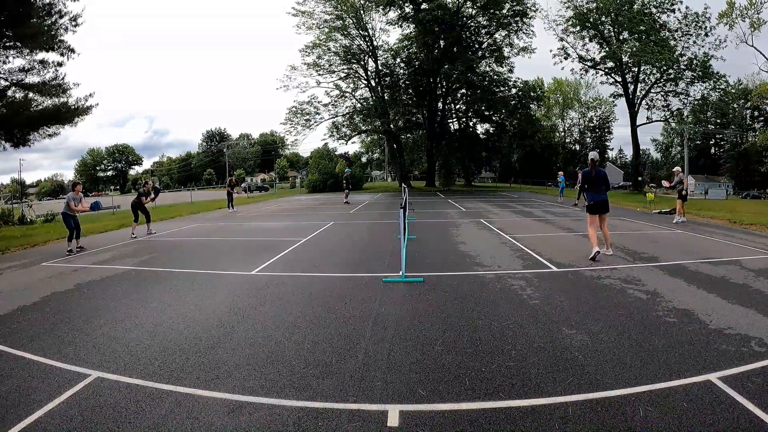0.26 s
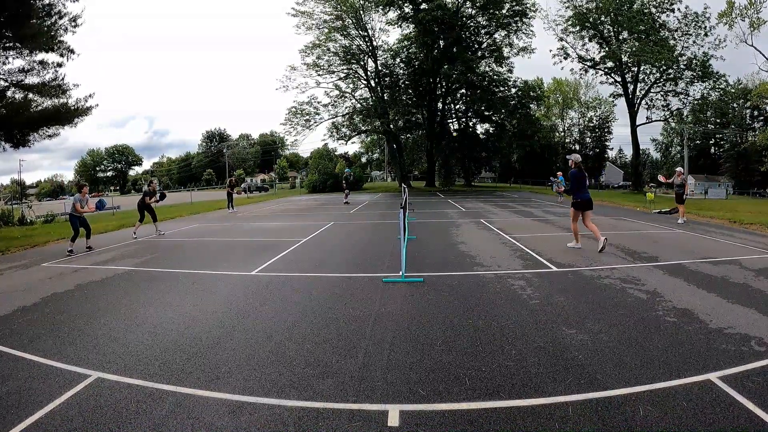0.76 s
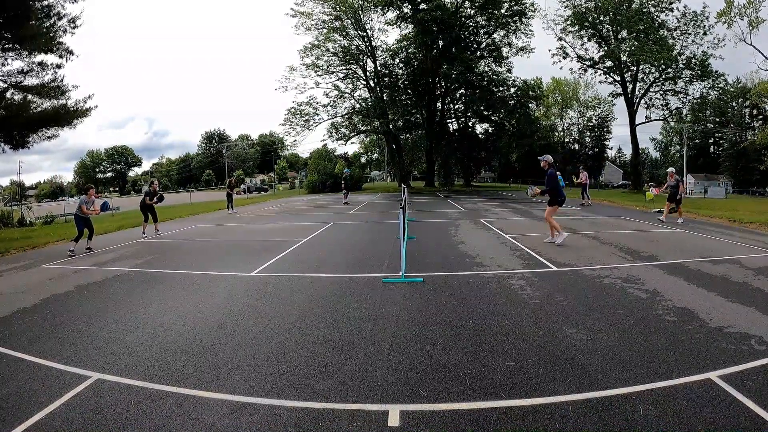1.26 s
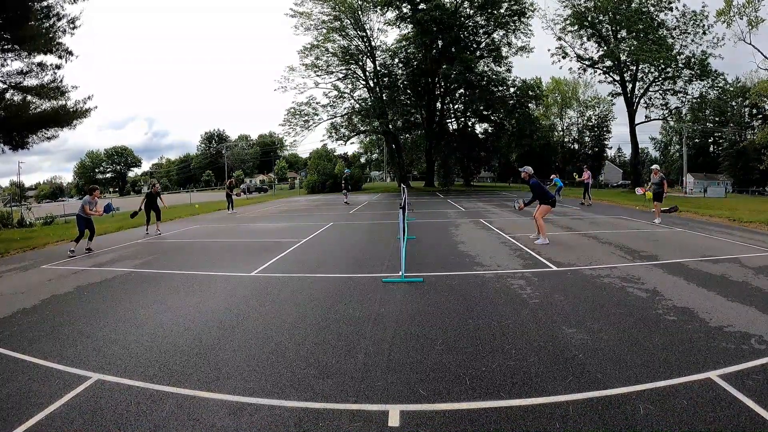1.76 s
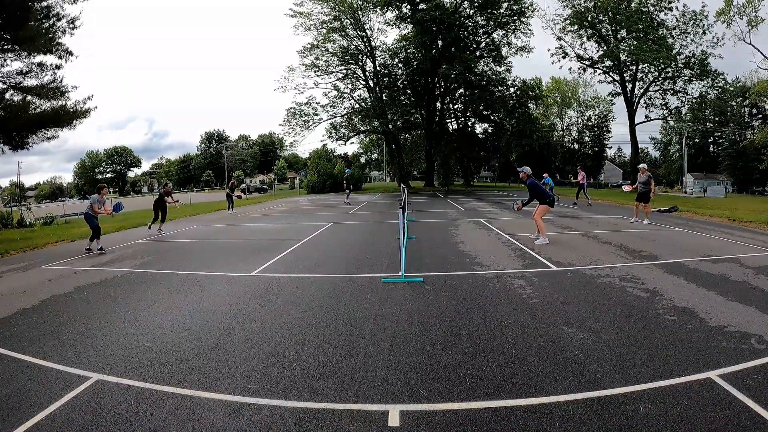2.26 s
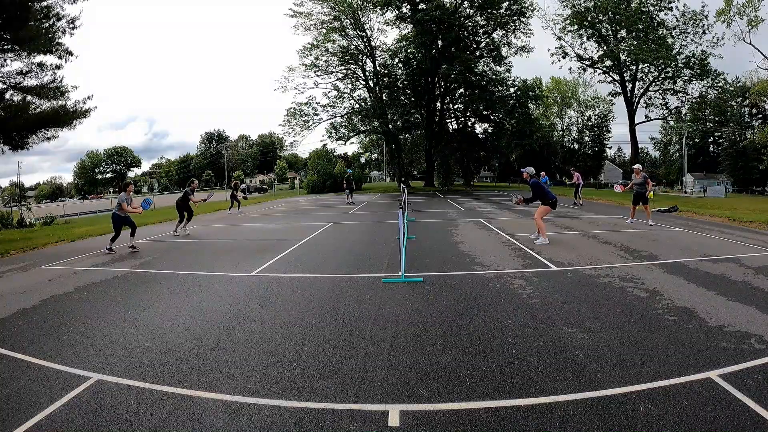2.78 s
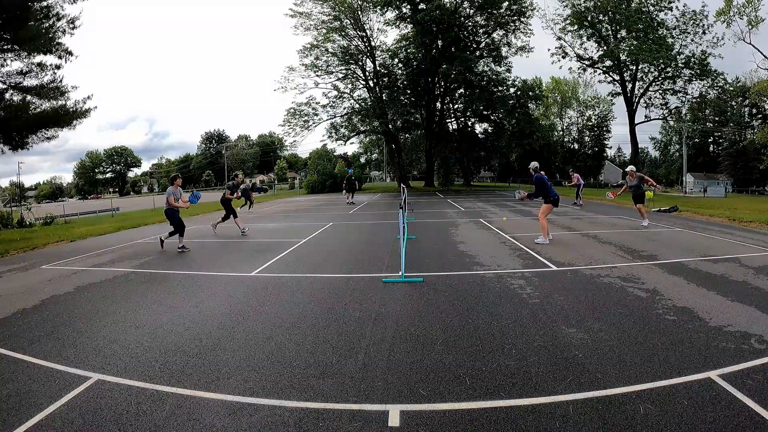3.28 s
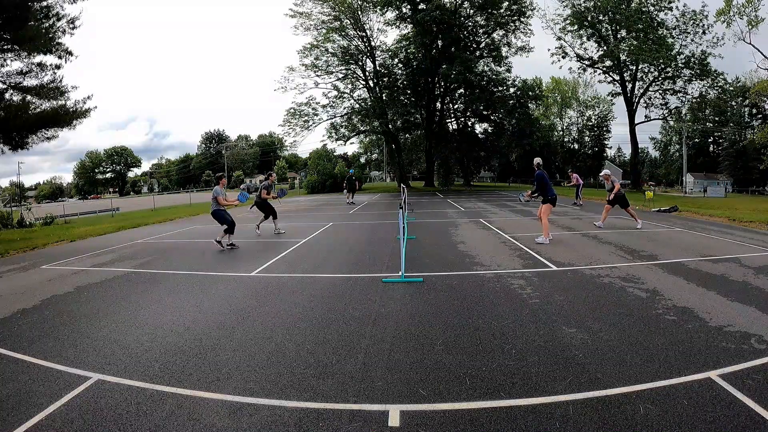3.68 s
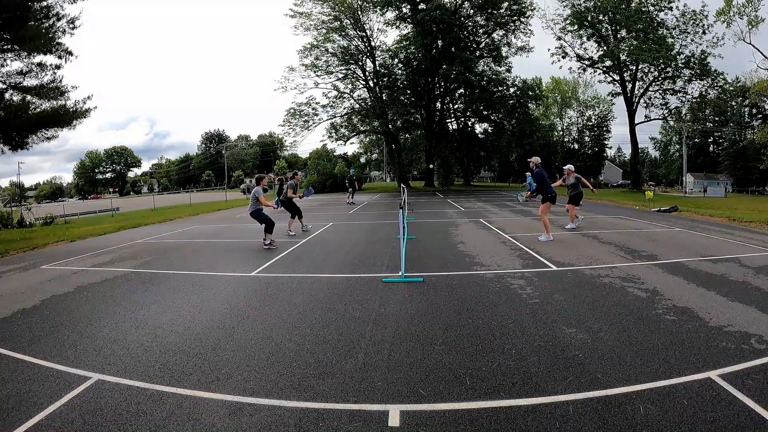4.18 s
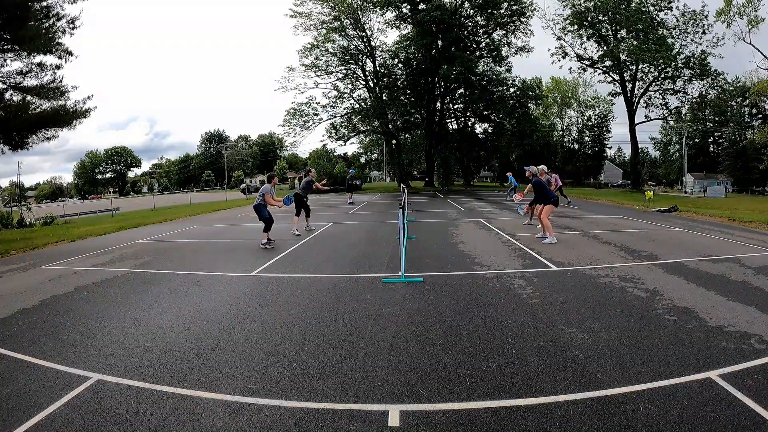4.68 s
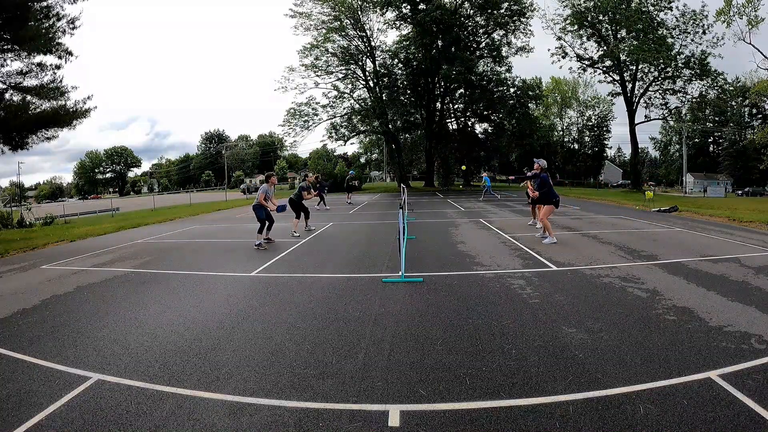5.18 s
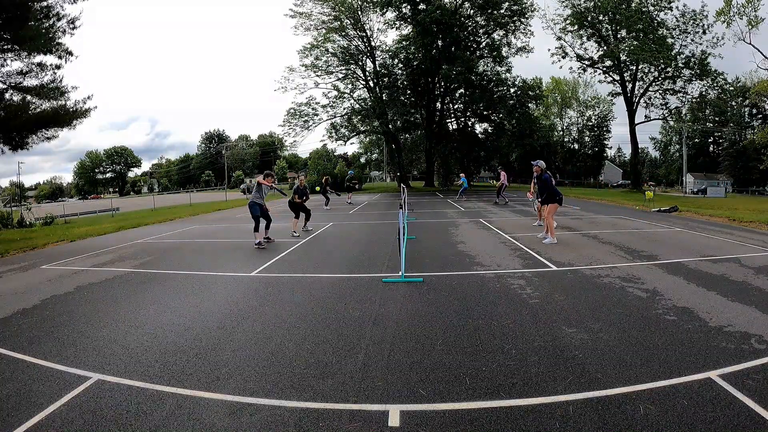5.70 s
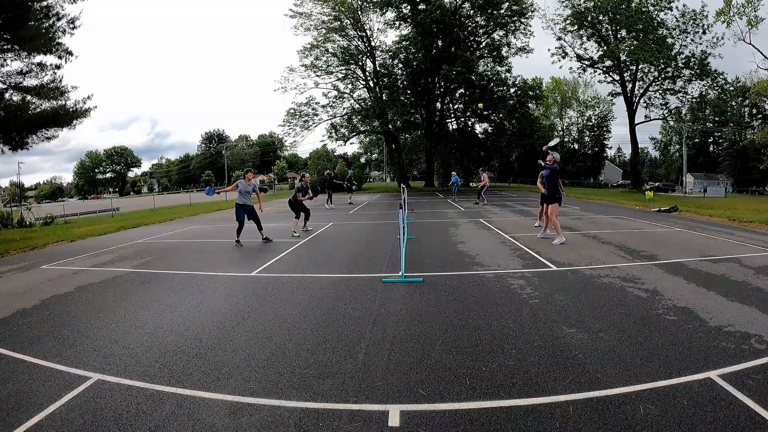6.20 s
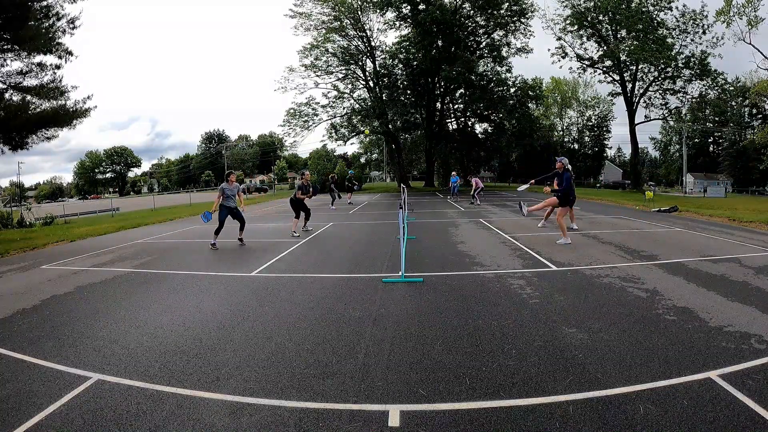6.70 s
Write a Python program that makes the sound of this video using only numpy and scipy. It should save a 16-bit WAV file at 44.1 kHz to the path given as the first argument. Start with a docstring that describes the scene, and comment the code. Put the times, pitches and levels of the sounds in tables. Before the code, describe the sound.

An open asphalt court among trees, heard by a fixed microphone with narrow stereo and muted treble. A low bed runs throughout: an unsteady idling engine, faint mains hum, far traffic and wind buffets, strongest near 2.6 s and again around 5.6 s. Leaves rustle very faintly. A shoe tap at 0.1 s precedes a loud hollow paddle pop at 0.4 s, with scattered echoes from trees and walls. Scuffs follow; thin falling bird whistles appear at 1.3 and 2.0 s. Two quick pops land at 2.35 and 2.43 s. Light grit and dull far-court pops come around 3.4 s. A weaker pop at 3.9 s and a sharper one at 4.1 s come with busy footwork. Hard pops follow at 4.7, 5.3, 5.6 and 5.8 s, then a softer one at 6.3 s and a strong one at 6.6 s. Faint whistles return at 5.9 and 6.7 s.

```python
"""Paddle game on a court among trees

Paddles pop a hard hollow ball on open asphalt: short fading tones, then noisy echoes from trees and walls.
Shoe taps, scuffs and some rough echoes of blows are clicks and grit; far pops and bird whistles are faint.
An idling engine and mains hum are unsteady tones; wind, traffic and leaves are shaped noise.
Two close microphone ports hear nearly the same sound."""
import sys
import numpy as np
from scipy import signal
from scipy.fft import rfft, irfft, next_fast_len
from scipy.io import wavfile
from scipy.ndimage import uniform_filter1d, map_coordinates

SR = 44100
rng = np.random.default_rng(int(sys.argv[2]) if len(sys.argv) > 2 else 0)


def pcm_store(signal):
    """Save signal as 16-bit PCM."""
    levels = np.round(np.clip(np.atleast_2d(signal), -1, 1) * 32767)
    wavfile.write(sys.argv[1], SR, levels.astype(np.int16).T)


N = 306429  # length in samples


def amp(db):
    """Turns decibels into a plain multiplier."""
    return 10 ** (np.asarray(db) / 20)


def unit(x):
    """Scales a sound to an rms of 1."""
    return x / np.sqrt(np.mean(x ** 2) + 1e-20)


def along(points, hz):
    """Reads a curve of (f/Hz, level/dB) points on a log frequency axis."""
    f, v = np.transpose(points)
    return np.interp(np.log(hz + 1), np.log(f + 1), v)


def level(rows):
    """Reads a curve of (t/s, level/dB) points, one value per sample."""
    return np.interp(np.arange(N) / SR, *np.transpose(rows))


def wobble(rate):
    """A smooth random curve with rate random points a second."""
    points = rng.standard_normal(int(N * rate / SR) + 4)
    return map_coordinates(points, [np.arange(N) * rate / SR])


def lumps(count, size):
    """Random steps, each size samples long."""
    return np.repeat(rng.standard_normal(count // size + 1), size)[:count]


def filtered(x, response):
    """Multiplies the spectrum of x by a response of frequency."""
    n = x.shape[-1]
    m = next_fast_len(n + 8192)
    return irfft(rfft(x, m) * response(np.fft.rfftfreq(m, 1 / SR)), m)[..., :n]


def rush(spectrum, patchy_db):
    """Shaped noise of rms 1, with patches of random gain in time and frequency."""
    z = signal.stft(rng.standard_normal(N + SR), nperseg=512)[2]
    across_pitch = uniform_filter1d(rng.standard_normal(z.shape), size=6, axis=0)
    patches = uniform_filter1d(across_pitch, size=10, axis=1)
    noise = signal.istft(z * amp(patchy_db * unit(patches)), nperseg=512)[1][:N]
    return unit(filtered(noise, lambda hz: amp(along(spectrum, hz))))


def tilted(size, low_hz, tilt_db):
    """Noise of rms 1, thin below low_hz and falling above it towards tilt_db an octave."""
    def slope(hz):
        return amp(tilt_db * np.log2(hz / low_hz + 1)) * hz ** 2 / (hz ** 2 + low_hz ** 2)
    return unit(filtered(rng.standard_normal(size), slope))


def ring(t, hz, t60, attack):
    """A struck tone: it builds up during the contact, then dies by 60 dB in t60 s; envelope peak 1."""
    shape = amp(-60 * t / t60) * (1 - np.exp(-t / attack))
    return shape / shape.max() * np.sin(2 * np.pi * hz * t)


def add(track, s, sound):
    """Mixes a sound into the track from s seconds on."""
    part = track[..., round(s * SR):][..., :sound.shape[-1]]
    part += sound[..., :part.shape[-1]]


def tone(hz):
    """A sine of rms 1 that follows a frequency curve."""
    return np.sqrt(2) * np.sin(2 * np.pi * np.cumsum(hz) / SR)


# How loud the idling engine is: (t/s, level/dB)
ENGINE_LEVEL = [(0, -32.5), (1.6, -32.5), (2.4, -38.5), (2.8, -41), (3.5, -44), (4.1, -37), (5, -49.5),
                (5.7, -44), (6.35, -35), (6.65, -47), (6.95, -35.5)]
ENGINE_HZ = 74


def engine():
    """An idling engine: one low note, slightly unsteady in pitch and more so in level."""
    return amp(level(ENGINE_LEVEL) + 1.2 * wobble(24)) * tone(ENGINE_HZ + 0.31 * wobble(2.64))


# Tones of the mains hum: (f/Hz, level/dB)
HUM_TONES = [(60, -53.5), (120, -48), (180, -53.5)]


def mains_hum():
    """Mains hum: a low tone and its overtones, each drifting a little in pitch and level."""
    return sum(amp(db + 2.5 * wobble(3)) * tone(hz + 0.4 * wobble(3)) for hz, db in HUM_TONES)


# Balance of the wind's rumble: (f/Hz, relative level/dB)
WIND_SPECTRUM = [(10, -22), (22, -5), (40, -1.5), (60, .5), (120, -5), (200, -16), (320, -35), (600, -120)]
# How loud the wind is: (t/s, level/dB)
WIND_LEVEL = [(0, -37.5), (.4, -33.5), (.75, -37.5), (1, -31.5), (1.3, -33.5), (1.7, -34.5), (2.35, -36),
              (2.6, -26.5), (3.15, -34), (3.6, -50), (4, -36), (4.45, -34.5), (4.8, -41), (5.2, -37),
              (5.6, -30), (6, -34.5), (6.4, -40.5), (6.95, -56)]


def wind():
    """Wind buffets: deep noise that swells and sinks."""
    gusts = unit(amp(1.5 * wobble(8)) * rush(WIND_SPECTRUM, patchy_db=1.2))
    return amp(level(WIND_LEVEL)) * gusts


# Balance of the traffic noise: (f/Hz, relative level/dB)
TRAFFIC_SPECTRUM = [(35, -5.5), (60, -3.5), (86, -4), (123, -15.5), (172, -7.5), (238, -12), (462, -26),
                    (757, -23.5), (1060, -26.5), (1280, -27), (2450, -39.5), (3500, -46), (4550, -80.5),
                    (7700, -120)]
# How loud the traffic is: (t/s, level/dB)
TRAFFIC_LOUDNESS = [(0, -36.5), (2, -37), (3, -35.5), (3.7, -38), (5, -36.5), (5.5, -34.5), (6.95, -36)]


def traffic():
    """Far traffic: mostly low noise with a slightly unsteady level."""
    return amp(level(TRAFFIC_LOUDNESS) + .8 * wobble(8)) * rush(TRAFFIC_SPECTRUM, patchy_db=1)


# Balance of the rustle: (f/Hz, relative level/dB)
LEAF_SPECTRUM = [(880, -4.5), (1500, -8.5), (2460, -13), (4040, -14.5), (5580, -22), (6250, -24.5),
                 (8250, -30), (9650, -40.5), (12000, -82), (15600, -100.5), (22000, -120)]
# How loud the rustle is: (t/s, level/dB)
LEAF_LEVEL = [(0, -52), (.7, -55.5), (1.9, -56), (2.3, -55), (2.7, -54), (3.3, -55.5), (4.2, -49.5),
              (5, -53), (5.5, -48.5), (6.1, -51.5), (6.95, -47.5)]


def leaves():
    """Rustling leaves: airy noise with a quick random flutter in level."""
    rustle_db = level(LEAF_LEVEL) + 2 * wobble(20) + 3.2 * wobble(45)
    return amp(rustle_db) * rush(LEAF_SPECTRUM, patchy_db=1.0)


# Falling whistles: (t/s, length/s, start f/Hz, fall/Hz per s, f where the note levels out/Hz,
# starting level/dB, fade/dB per s)
WHISTLES = [(1.34, .35, 3500, 950, 3150, -57.5, 12), (1.41, .16, 4280, 950, 4100, -67.5, 10),
            (2.04, .29, 3480, 1400, 3270, -60, 25), (5.9, .3, 3520, 1100, 3230, -58, 22),
            (6.7, .25, 3480, 800, 3280, -62, 5)]
WAVER_HZ = 14  # size of the random waver in pitch


def bird():
    """Thin whistles that fall and fade, blurred by their echoes in the woods."""
    out = np.zeros(N)
    for s, length, start_hz, sag, hold_hz, db, fade_db in WHISTLES:
        t = np.arange(round(length * SR)) / SR
        edges = np.clip(np.minimum(t, length - t) / 0.05, 0, 1)
        pitch = np.maximum(start_hz - sag * t, hold_hz) + WAVER_HZ * wobble(30)[:len(t)]
        add(out, s, amp(db - fade_db * t) * edges * tone(pitch))
    t = np.arange(SR // 2) / SR
    woods = rng.standard_normal(len(t)) * amp(-60 * t / 0.55) * (1 - np.exp(-(t / .09) ** 2))
    out = out * amp(2 * wobble(25))
    return out + amp(-7) * signal.fftconvolve(out, woods / np.linalg.norm(woods))[:N]


# Pops from the far court: (t/s, level of the main tone/dB, f/Hz)
DISTANT_POPS = [(2.1643, -49, 760), (3.4366, -33.5, 1010), (3.4644, -34.5, 750), (3.8146, -36, 930),
                (4.133, -35, 700), (5.1075, -37, 1220), (5.121, -36, 1280)]


def far_court():
    """Dull, short pops of another game: a tone, its octave and a rough scatter of noise."""
    out, t = np.zeros(N), np.arange(SR // 10) / SR
    for s, db, hz in DISTANT_POPS:
        pop = ring(t, hz, 0.041, attack=0.00071)
        octave = 0.37 * ring(t, 2.0 * hz, 0.0074, attack=.0004)
        rough = amp(2.8 * lumps(len(t), size=90) - 60 * t / 0.26)
        scatter = 0.16 * rough * tilted(len(t), hz, -17)
        add(out, s, amp(db) * (pop + octave + scatter))
    return out


# Short gritty clicks, shoe taps and a clicking echo after a blow:
# (t/s, click level/dB, click f/Hz, grit level before its fade/dB)
GRITTY_CLICKS = [(0.0744, -34.5, 2500, -36.5), (1.6921, -37.5, 2600, -38), (2.7545, -55, 1990, -37.5),
                 (3.3462, -39.5, 2400, -42), (3.536, -34, 2490, -34), (3.602, -62, 1530, -44.5),
                 (3.836, -43, 3370, -49), (3.94, -30, 2200, -55), (3.956, -34, 1280, -44),
                 (3.991, -41, 1800, -46), (4.132, -42, 1660, -41), (4.172, -30, 2450, -39),
                 (4.328, -36, 2400, -50), (4.918, -38, 3300, -41.5), (5.15, -39, 2250, -38.5),
                 (5.6914, -27.5, 2580, -33.5), (5.9845, -36.5, 1850, -46), (6.5317, -36.5, 2020, -49)]
KNOCK_DB, KNOCK_HZ = -4, 440  # the dull knock, level over the click
GRIT_TILT_DB = -12  # per octave


def gritty_clicks():
    """Short clicks with a dull knock and fading grit: taps, and a clicking echo after a blow."""
    out, t = np.zeros(N), np.arange(SR // 5) / SR
    for s, db, hz, grit_db in GRITTY_CLICKS:
        click = ring(t, hz, 0.012, attack=0.00027)
        knock = amp(KNOCK_DB) * ring(t, KNOCK_HZ, 0.03, attack=0.0007)
        grit = tilted(len(t), 1700, GRIT_TILT_DB) * amp(-60 * t / 0.046) * (1 - np.exp(-t / 0.0017))
        add(out, s, amp(db) * (click + knock) + amp(grit_db) * grit)
    return out


# Scuffs and gritty bursts, one of them a rough echo after a blow:
# (t/s, level before the swell shapes it/dB, length/s)
GRITTY_BURSTS = [(0.329, -45.5, 0.084), (0.81, -52, 0.064), (0.93, -44, 0.05), (1.133, -58, 0.07),
                 (2.043, -56, 0.11), (2.142, -56, 0.049), (2.892, -51, 0.063), (2.941, -54.5, 0.049),
                 (2.986, -53, 0.15), (3.078, -52, 0.024), (3.453, -52.5, 0.17), (3.916, -34, 0.15),
                 (4.309, -45, 0.057), (4.438, -53.5, 0.079), (4.695, -39, 0.079), (4.884, -47, 0.088),
                 (5.123, -51, 0.1), (6.165, -57, 0.13), (6.408, -52, 0.052), (6.599, -41, 0.075),
                 (6.881, -51, 0.096)]
SOFT_DB, SOFT_HZ = -51, 2450  # a burst of this level hisses above this frequency
DEEPENS = 0.06  # octaves lower per dB louder
BURST_TILT_DB = -18.5  # per octave
GRAIN_DB = 3.5  # level scatter of the grit


def gritty_bursts():
    """Scuffs and a rough echo: grainy noise that swells and fades; louder bursts sound deeper."""
    out, t = np.zeros(N), np.arange(SR // 5) / SR
    for s, db, length in GRITTY_BURSTS:
        swell = np.sin(np.pi * np.clip(t / max(length, .01), 0, 1) ** .6) ** 1.5
        grains = amp(GRAIN_DB * lumps(len(t), size=90))
        low_hz = SOFT_HZ * 2 ** (DEEPENS * (SOFT_DB - db))
        add(out, s, amp(db) * swell * unit(grains * tilted(len(t), low_hz, BURST_TILT_DB)))
    return out


CANOPY_S, CANOPY_RISE_S, CANOPY_T60_S = 0.027, 0.086, 0.22  # first return, swell, decay


def canopy(crack):
    """The leaves hiss the crack back: smooth, dense echoes that swell and die."""
    t = np.clip(np.arange(SR // 2) / SR - CANOPY_S, 0, None)
    swell = 1 - np.exp(-(t / CANOPY_RISE_S) ** 2)
    tail = swell * amp(-60 * t / CANOPY_T60_S) * rng.standard_normal(len(t))
    return signal.fftconvolve(crack, tail / np.linalg.norm(tail))


WALL_DB, FAR_WALL_S, FAR_WALL_DB = -4, .167, -11  # two clear slaps among the tree echoes
WALL_SMEAR_S = .001


def wall_slap(t, s, db):
    """One wall's echo: a short burst, since a rough wall spreads the sound in time."""
    bell = np.exp(-.5 * ((t - s) / WALL_SMEAR_S) ** 2)
    burst = unit(bell * (1 + 3 * rng.standard_normal(len(t))))
    return amp(db) * burst / np.sqrt(len(t))


# Echo clumps from low bushes, the tree line and the woods behind:
# (delay t/s, relative level/dB, spread/s)
ECHO_CLUMPS = [(.04, -13, .02), (.088, 1, .017), (.125, -5, .014), (0.18, -12.5, 0.13)]
TRUNK_DB = 1.5  # level scatter of single trunk echoes


def trees(pop, wall_s):
    """Clumps of scattered echoes and two walls' slaps, new for every pop and dull from the leaves."""
    t = np.arange(SR // 2) / SR
    spread = sum(amp(db) * np.exp(-.5 * ((t - s) / w) ** 2) for s, db, w in ECHO_CLUMPS)
    trunks = amp(TRUNK_DB * lumps(len(t), size=120))  # single trunks stand out
    tail = spread * trunks * rng.standard_normal(len(t))
    walls = wall_slap(t, wall_s, WALL_DB) + wall_slap(t, FAR_WALL_S, FAR_WALL_DB)
    back = signal.fftconvolve(pop, tail / np.linalg.norm(tail) + walls)
    return filtered(back, lambda hz: hz ** 2 / (hz ** 2 + 450 ** 2) / (1 + (hz / 6000) ** 2))


def near_echo(sound):
    """Net, posts and players smear the pop over some milliseconds."""
    post = rng.standard_normal(700) * amp(-14 * np.arange(700) / 700)
    return signal.fftconvolve(sound, post / np.linalg.norm(post))


RATTLE_DB, RATTLE_HZ, RATTLE_T60_S = -14.5, 860, 0.064  # level over the thump


def paddle_rattle(t, thump_db):
    """The struck paddle buzzes roughly: noise with a jumpy, fading level."""
    buzz = amp(1.7 * lumps(len(t), size=60) - 60 * t / RATTLE_T60_S) * (1 - np.exp(-t / 0.0025))
    return amp(thump_db + RATTLE_DB) * buzz * tilted(len(t), RATTLE_HZ, -26.5)


def ball_click(t, click_db):
    """The ball wall buckles in a fraction of a millisecond: a sharp flick with a little noise."""
    flick = -ring(t, 2600, .0015, attack=.0001)
    hiss = tilted(len(t), 1800, -5) * amp(-60 * t / 0.05)
    return amp(click_db) * (1.5 * flick + 0.14 * hiss)


# Tones of the ball's shell and hole rims: (f over the ball pitch, relative level/dB, 60 dB decay t/s)
BALL_TONES = [(1, -3, 0.014), (1.28, -8.5, 0.015), (1.55, -0.5, 0.0028), (1.9, -7, 0.0045)]
BALL_SCATTER_DB, BALL_DETUNE = 1.5, .012  # random spread of level, and of pitch as a share


def ball_shell(t, ball_db, ball_hz):
    """The hollow ball rings in several modes, a little differently at each blow."""
    out = np.zeros(len(t))
    for ratio, mode_db, decay in BALL_TONES:
        db = ball_db + mode_db + BALL_SCATTER_DB * rng.normal()
        hz = ball_hz * ratio * (1 + BALL_DETUNE * rng.normal())
        out += amp(db) * ring(t, hz, decay, attack=0.00055)
    return out


# Blows on the ball: (t/s, face level/dB, face f/Hz, face 60 dB decay t/s, thump level/dB, thump f/Hz,
# overtone level/dB, overtone f/Hz, ball base level/dB, ball pitch f/Hz, click base level/dB,
# ground echo t/ms, near post echo t/ms, near post echo relative level/dB, wall echo t/ms,
# tree echo relative level/dB, level of the crack toward the trees/dB, left over right level/dB)
BLOWS = [(0.3858, -11, 1149, 0.035, -9.5, 295, -31, 2350, -24.5, 3100, -56, 1.2, 23, -27, 86, -10.5, -15, -1.5),
         (2.348, -25, 1184, 0.014, -8.5, 474, -47, 1960, -23.5, 3340, -19, 1.5, 17, -16, 58, -8, -13.5, -1.5),
         (2.435, -17.5, 1030, 0.014, -13.5, 534, -32, 1860, -30, 2830, -32.5, .94, 22, -20, 96.5, -10.5, -16.5, 1),
         (3.8794, -23.5, 1165, 0.02, -23, 580, -35, 1740, -48, 3250, -31, 1.45, 15, -3.5, 55, -12, -23, .5),
         (4.0972, -23.5, 1165, 0.019, -15, 302, -29.5, 2010, -22.5, 3160, -16, .91, 17, -6, 70, -4.5, -15.5, 1.2),
         (4.6695, -11, 830, 0.0073, -15.5, 240, -21, 1630, -20.5, 2750, -22, 1.32, 18, -21, 82, -13.5, -15.5, 0.5),
         (5.302, -17, 858, 0.021, -13.5, 563, -22, 1834, -27.5, 3140, -14, 1.59, 13, -6, 104, -3, -12, -1.5),
         (5.5747, -17, 1035, 0.031, -15, 324, -25.5, 1610, -30, 3220, -36.5, 1.25, 20, -25, 82, -11.5, -19, -1),
         (5.8031, -35, 1140, 0.038, -9.5, 344, -23.5, 1860, -28.5, 3370, -14.5, 1.54, 9.2, -8, 66, -11.5, -16.5, 1.5),
         (6.2698, -28.5, 1200, 0.021, -19.5, 390, -31, 1739, -35.5, 3130, -25.5, 1.4, 22, -7.5, 64, -4, -15, 0.7),
         (6.6444, -10.5, 872, 0.03, -17, 447, -19.5, 1626, -28, 2550, -17, 1.11, 19, -19, 83, -6, -17, -1.5)]
# Seen edge-on from the trees the blow is also a broad slap: level over the face ring, times its pitch
SLAP_DB, SLAP_OVER_FACE, SLAP_T60_S = 1, 1.53, 0.0032
# Share of each part that reaches the trees beside the face ring
THUMP_CARRY, OVER_CARRY, BALL_CARRY, RATTLE_CARRY = .5, 1.1, .5, 1.8


def hits():
    """Paddle face, thump and overtone, ball modes, a click doubled off the asphalt, then the echoes."""
    out, t = np.zeros((2, N)), np.arange(SR // 10) / SR
    for (s, db, hz, t60, thump_db, thump_hz, over_db, over_hz, ball_db, ball_hz, click_db,
         echo_ms, post_ms, post_db, wall_ms, wet_db, crack_db, pan_db) in BLOWS:
        face = amp(db) * ring(t, hz, t60, attack=0.003)
        thump = amp(thump_db) * ring(t, thump_hz, 0.0098, attack=0.0017)
        over = amp(over_db) * ring(t, over_hz, 0.011, attack=0.0024)
        ball = ball_shell(t, ball_db, ball_hz)
        rattle = paddle_rattle(t, thump_db)
        click = ball_click(t, click_db)
        bounce = .8 * np.roll(click, round(echo_ms * SR / 1000))  # off the asphalt
        pop = face + thump + over + ball + click + bounce + rattle
        add(out, s - .0003, pop * amp([[pan_db / 2], [-pan_db / 2]]))

        # [None] sends the same echo to both ports
        near = near_echo(face + over + rattle)
        add(out, s + post_ms / 1000, amp(post_db) * near[None])
        crack = amp(crack_db) * ring(t, 2200, 0.00021, attack=.00008)  # a broad pulse with no ring
        add(out, s, canopy(crack)[None])
        slap = amp(db + SLAP_DB) * ring(t, SLAP_OVER_FACE * hz, SLAP_T60_S, attack=0.00012)
        outward = face + slap + THUMP_CARRY * thump + OVER_CARRY * over
        outward = outward + BALL_CARRY * ball + RATTLE_CARRY * rattle
        add(out, s, amp(wet_db) * trees(outward, wall_ms / 1000)[None])
    return out


# How far the difference between the ports lies below the shared sound: (f/Hz, relative level/dB)
PORT_DIFFERENCE = [(60, -91.5), (110, -79.5), (200, -100), (370, -26), (670, -33), (1230, -31), (2250, -25),
                   (4110, -17.5), (7530, -12), (13800, -0.5)]


def port_side(sound):
    """The ports differ a little: a scattered copy of the sound and some wind go to the side."""
    scatter = rng.standard_normal(2000) * amp(-60 * np.arange(2000) / 2000)
    copy = signal.fftconvolve(sound, scatter / np.linalg.norm(scatter))[:N]
    side = filtered(copy, lambda hz: amp(along(PORT_DIFFERENCE, hz)))
    return side + amp(-66 + 4 * wobble(2)) * rush(WIND_SPECTRUM, patchy_db=1.2)


def scene():
    """Adds all the sources; the side is added to one port and taken from the other."""
    background = engine() + mains_hum() + wind() + traffic() + leaves()
    mid = background + bird() + far_court() + gritty_clicks() + gritty_bursts()
    struck = hits()
    side = port_side(mid + struck.mean(axis=0))
    return struck + np.array([mid + side, mid - side])


# Treble response of the microphone: (f/Hz, level/dB)
MIC_RESPONSE = [(7000, 0.5), (9500, 1), (10800, -12.5), (13500, -8.5)]
TOP_HZ = 13700  # band limit


def record(dry):
    """The microphone loses treble, and nothing is kept above the band limit."""
    return filtered(dry, lambda hz: amp(along(MIC_RESPONSE, hz)) * (hz < TOP_HZ))


dry = scene()
out = record(dry)
pcm_store(out)
```